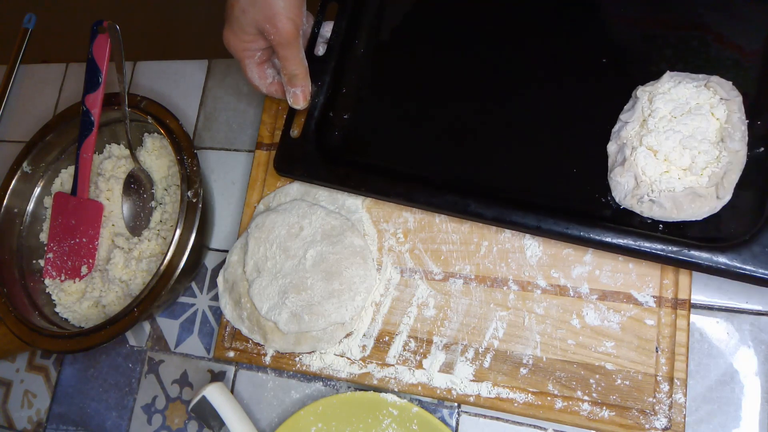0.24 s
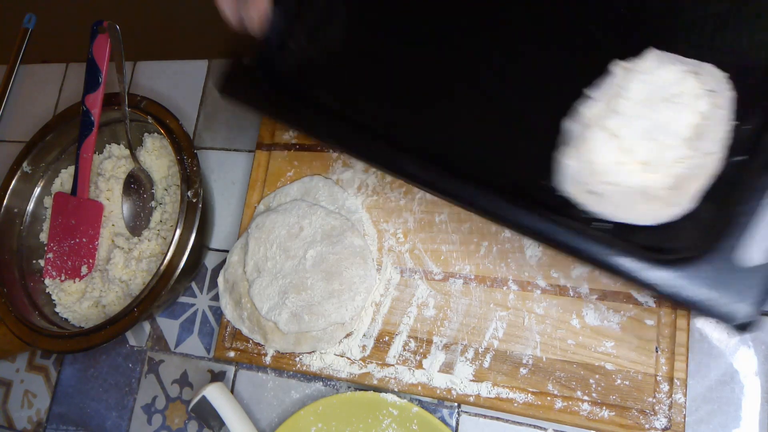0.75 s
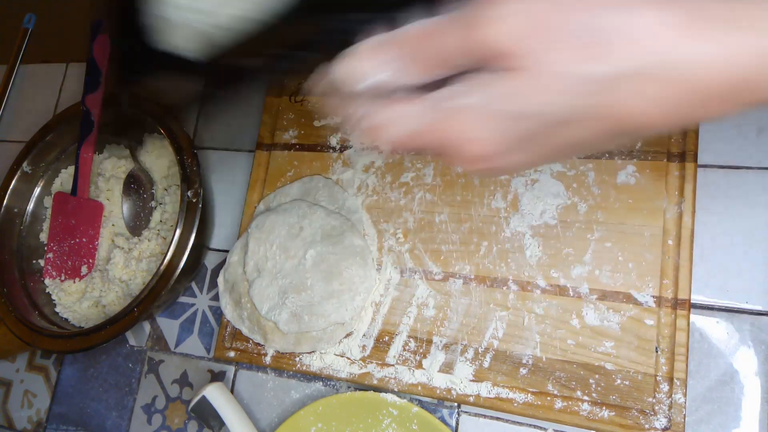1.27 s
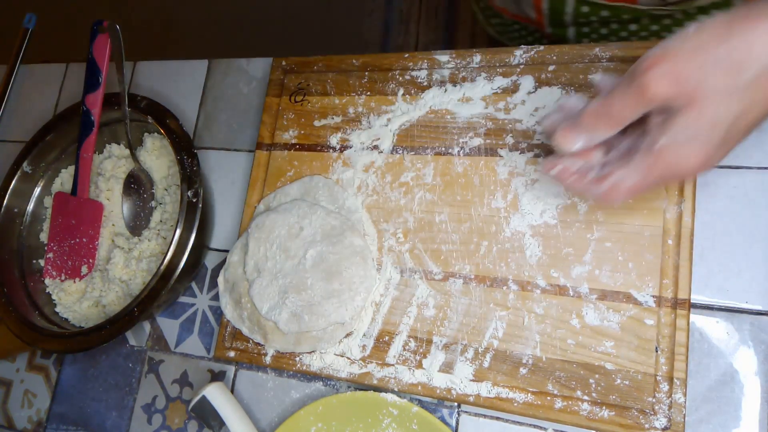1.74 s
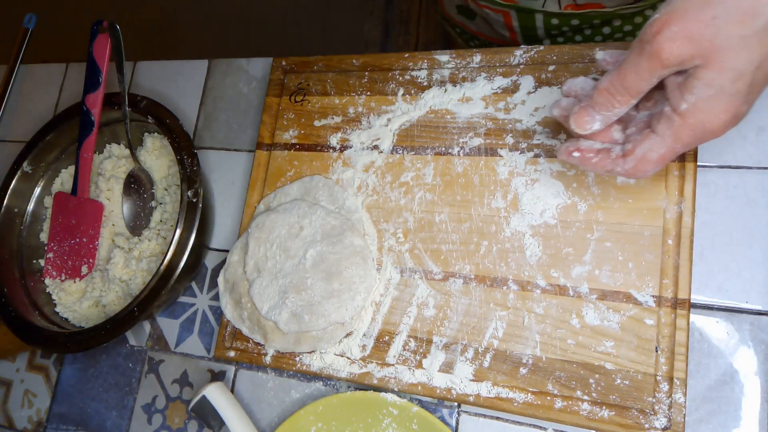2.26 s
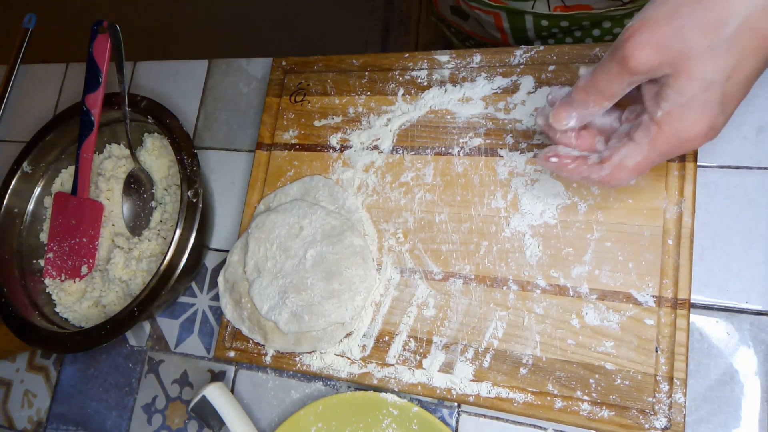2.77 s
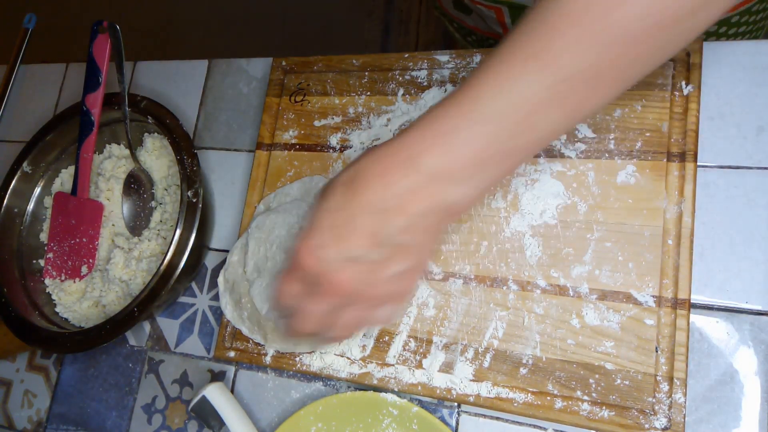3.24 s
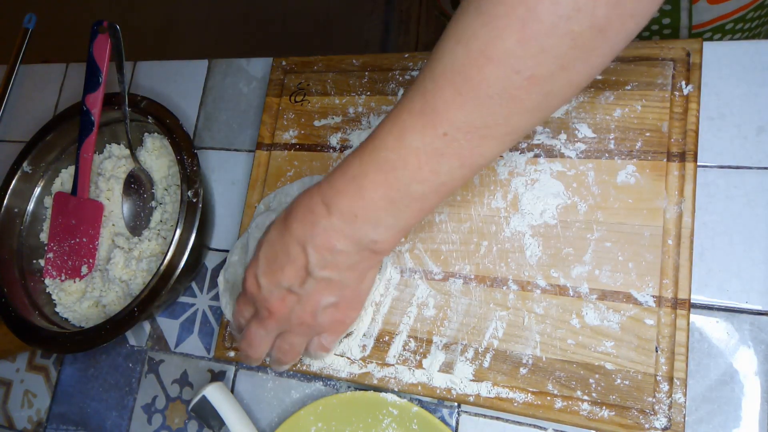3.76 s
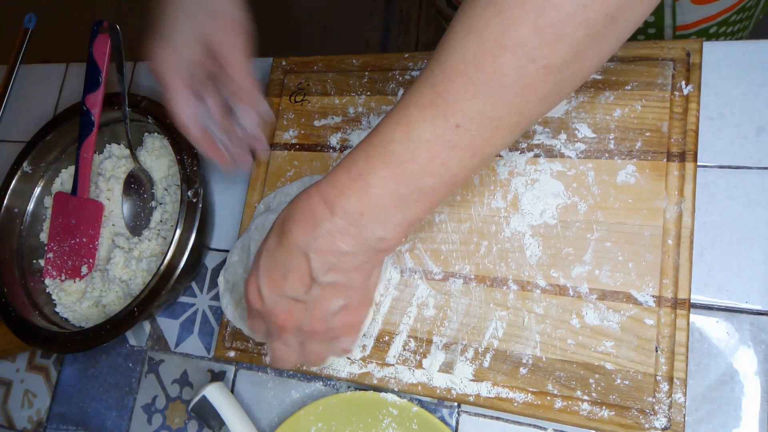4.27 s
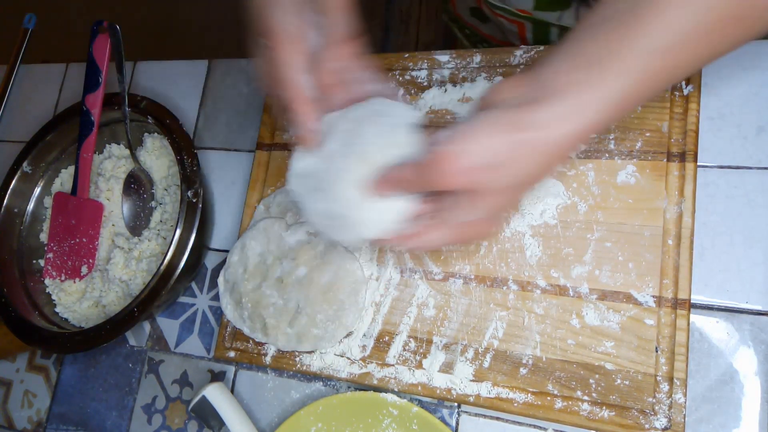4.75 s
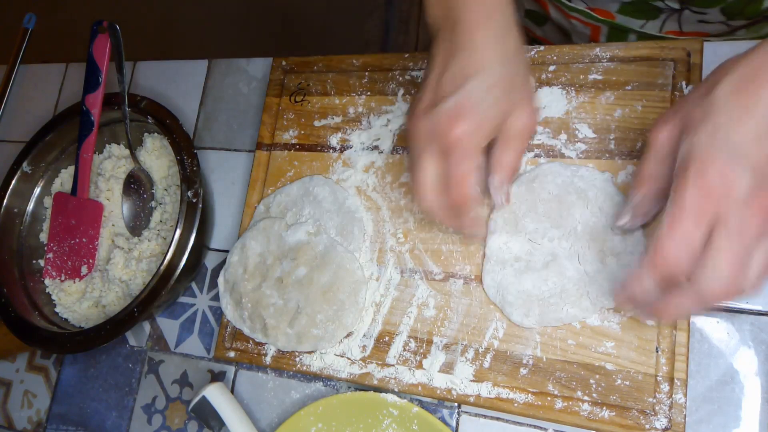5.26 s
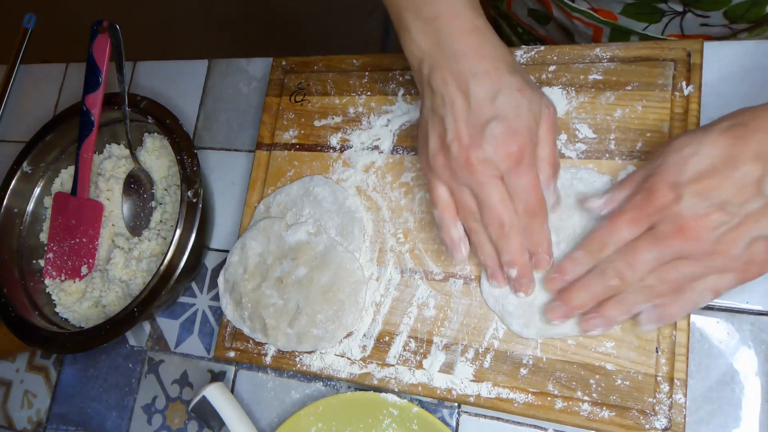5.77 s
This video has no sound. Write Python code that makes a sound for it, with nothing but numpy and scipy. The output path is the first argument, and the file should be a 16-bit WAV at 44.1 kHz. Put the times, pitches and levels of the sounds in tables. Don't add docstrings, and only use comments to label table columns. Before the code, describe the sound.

Gritty tray scraping, a loud woody slam and smaller bumps, followed by faint dough pats and floury rubbing over a low fridge hum.

```python
import sys
import numpy as np
from scipy import signal
from scipy.fft import rfft, irfft, next_fast_len
from scipy.io import wavfile
from scipy.ndimage import uniform_filter1d, map_coordinates

SR = 44100
rng = np.random.default_rng(int(sys.argv[2]) if len(sys.argv) > 2 else 0)


def invert_db(level):
    return 10 ** (np.asarray(level, dtype=float) / 20)


def persist_wave(psi):
    counts = np.round(np.clip(psi, -1, 1) * 32767).astype(np.int16)
    wavfile.write(sys.argv[1], SR, np.atleast_2d(counts).T)


N = 265041


def unit(x):
    return x / np.sqrt(np.mean(x ** 2) + 1e-20)


def along(points, hz):
    f, v = np.transpose(points)
    return np.interp(np.log(hz + 1), np.log(f + 1), v)


def wobble(rate_hz, count=N):
    knots = rng.standard_normal(int(count * rate_hz / SR) + 4)
    return map_coordinates(knots, [np.arange(count) * rate_hz / SR])


def filtered(x, response):
    m = next_fast_len(N + SR // 2)
    return irfft(rfft(x, m) * response(np.fft.rfftfreq(m, 1 / SR)), m)[:N]


def patchy(x, patchy_db, bins, frames):
    z = signal.stft(x, nperseg=512)[2]
    field = uniform_filter1d(rng.standard_normal(z.shape), bins, 0)
    field = uniform_filter1d(field, frames, 1)
    return signal.istft(z * invert_db(patchy_db * unit(field)), nperseg=512)[1][:N]


def dying_noise(colour, t60, count):
    hz, frame_s, z = signal.stft(rng.standard_normal(count), SR, nperseg=256)
    z *= invert_db(along(colour, hz)[:, None] - 60 * frame_s / along(t60, hz)[:, None])
    tail = signal.istft(z, SR, nperseg=256)[1][:count]
    return tail / np.sqrt(np.mean(tail[:SR // 50] ** 2))


def stroke_swell(t, rise_s, fall_s):
    return invert_db(-20 * np.abs(t / np.where(t < 0, rise_s, fall_s)) ** 1.39)


def friction(strokes, colour, spectrum, peaks, edges_hz, grit_db, ring_db, patchy_db):
    grain_db = grit_db * rng.exponential(size=N) + 1.13 * wobble(60)
    grains = patchy(rng.standard_normal(N) * invert_db(grain_db), patchy_db, 2, 10)

    def ring(f):
        modes = sum(invert_db(db) * 1j * f * w / (c * c - f * f + 1j * f * w) for c, w, db in peaks)
        return 1 + invert_db(ring_db) * modes

    def above(f, edge):
        return 1 / (1 + (edge / (f + 1)) ** 12)

    def body(f, low, high):
        return (above(f, low) - above(f, high)) * invert_db(along(spectrum, f)) * ring(f)

    bands = [unit(filtered(grains, lambda f: body(f, low, high))) for low, high in zip(edges_hz, edges_hz[1:])]
    dull, middle, *bright = bands
    power = np.zeros((len(bands), N))
    t = np.arange(-SR // 4, SR // 4) / SR
    for s, db, rise_s, fall_s, tilt_db in strokes:
        at = np.arange(len(t)) + round(s * SR) - SR // 4
        inside = (at >= 0) & (at < N)
        swell = invert_db(db) * stroke_swell(t, rise_s, fall_s)[inside]
        parts = invert_db(np.array([0] + [base_db + slope * tilt_db for base_db, slope in colour]))
        power[:, at[inside]] += np.outer(parts, swell) ** 2
    return np.sum(np.sqrt(power) * [middle, dull, *bright], axis=0)


def kitchen():
    # f/Hz, level/dB
    floor = [(15, -35), (40, -19), (60, -10.5), (123, -2), (200, -4), (240, -4), (300, -11.5), (750, -14.5),
             (1600, -18.5), (4000, -23), (6800, -25), (8000, -33), (13500, -33), (14800, -28),
             (16000, -23.5)]
    # f/Hz, level/dB rms
    hum_lines = [(236.9, -69), (473.7, -92), (705.2, -84.5), (748.3, -81.5)]
    hiss = filtered(patchy(rng.standard_normal(N), 1.55, 2, 10), lambda f: invert_db(along(floor, f)))
    t = np.arange(N) / SR
    hum = sum(invert_db(db + 3 + 0.4 * wobble(27)) * np.sin(2 * np.pi * hz * t + .4 * wobble(4)) for hz, db in hum_lines)
    rumble = filtered(hiss, lambda f: 1 / (1 + (f / 190) ** 8))
    hiss += (invert_db(2.5 * wobble(7) - 1) - 1) * rumble
    return invert_db(-64.5) * unit(hiss) + invert_db(-1.8) * hum


def hands():
    # peak t/s, level/dB, rise/s, fall/s, treble tilt/dB
    rubs = [(1.68, -76, .1, .05, 0), (1.806, -68, .012, 0.055, -3), (1.94, -78, 0.039, 0.059, 3),
            (2.412, -70, .015, .08, 1), (2.514, -72, .04, .07, -1), (3.124, -73, 0.06, .05, 1),
            (3.264, -74.5, 0.12, 0.098, -1.5), (3.365, -64, .07, .04, 7), (3.392, -60, .04, 0.045, 2),
            (3.518, -70, 0.068, 0.12, 2), (3.874, -78, .018, 0.027, 8), (4.496, -72.5, .032, 0.11, -3.5),
            (4.898, -74, .045, .03, 1), (5.1, -68, .08, .05, 5), (5.15, -59, .05, .04, 4),
            (5.183, -54.5, .05, .065, -4), (5.414, -76, 0.032, 0.035, 9), (5.452, -64.5, 0.011, 0.036, 2),
            (5.52, -73, 0.076, .04, 2), (5.64, -62.5, 0.036, 0.067, 3.5), (5.71, -72.5, .08, .06, 2),
            (5.8, -73, .04, 0.087, -4), (5.864, -66, 0.073, 0.024, 9.5), (5.965, -76, .03, .06, 3)]
    # level at tilt 0/dB, slope/(dB per dB tilt)
    rub_parts = [(-3, -1.22), (-7.5, 0.59)]
    # f/Hz, level/(dB per Hz)
    rub = [(590, -12), (1000, -8.5), (1390, -11), (2290, -5), (2610, -4.5), (2980, -1.5), (4160, 1),
           (4960, 10.5), (9300, 5.5), (14000, -14)]
    # f/Hz, width/Hz, level/dB
    skin = [(2010, 43, -12.5), (2260, 290, -0.5), (3000, 19, 2), (3740, 270, -4.5), (4380, 63, -19),
            (4600, 240, -21), (6500, 300, 3), (9260, 62, 4)]
    return friction(rubs, rub_parts, rub, skin, edges_hz=(900, 4000, 8000, 15000),
                    grit_db=0, ring_db=0, patchy_db=4)


def pats():
    # t/s, peak level/dB, f/Hz, t60/s
    knocks = [
        (0.569, -63, 1020, 0.08),
        (0.739, -61, 1020, 0.2),
        (1.03, -55, 324, 0.25),
        (4.508, -59.5, 813, 0.13),
        (5.145, -54, 434, 0.11),
        (5.185, -50, 432, 0.077),
        (5.449, -60, 407, 0.16),
    ]
    out, t = np.zeros(N + SR), np.arange(SR // 4) / SR
    for s, db, hz, t60 in knocks:
        attack = 1 - np.exp(-t / 0.0018)
        out[round(s * SR):][:len(t)] += invert_db(db - 60 * t / t60) * attack * np.sin(2 * np.pi * hz * t)
    return out[:N]


def rings_and_squeaks():
    # t/s, level/dB, f/Hz, length/s, width/Hz
    tray_rings = [(0.576, -43.5, 1770, 0.01, 410), (0.56, -63, 1800, 0.0096, 300),
                  (0.633, -54, 2300, 0.035, 750), (0.744, -48, 2020, 0.028, 80),
                  (1.264, -59, 1633, 0.071, 78), (.76, -58.5, 1050, 0.053, 450),
                  (1.02, -56.5, 1120, 0.09, 470), (1.1, -62, 1050, 0.03, 350), (0.99, -74, 2700, .06, 100),
                  (1.33, -75, 2500, 0.052, 93), (0.761, -63, 333, 0.027, 93),
                  (2.161, -62, 10570, 0.0085, 600), (2.17, -62, 5850, 0.027, 900),
                  (2.52, -74, 11000, .015, 200), (2.628, -70.5, 5800, 0.051, 1200)]
    # t/s, level/dB, f/Hz, length/s, width/Hz
    squeaks = [(1.742, -67, 14000, .004, 3000), (1.8017, -52, 9000, 0.0008, 6000),
               (1.8048, -50, 9000, 0.001, 6000), (1.805, -70, 1600, 0.019, 300),
               (3.08, -67, 2010, 0.062, 40), (3.385, -65, 2010, 0.095, 40), (3.4, -66, 3680, .05, 60),
               (3.365, -70, 8500, .03, 300), (3.365, -71, 10100, .03, 100), (5.181, -56, 4500, .003, 4000),
               (3.38, -66, 5100, 0.045, 120), (3.499, -72, 8640, 0.049, 100), (4.894, -70, 4100, .02, 200),
               (5.189, -58, 940, 0.025, 80), (5.216, -64, 845, 0.022, 80)]
    out = np.zeros(N + SR)
    t, f = np.arange(-SR // 4, SR // 4) / SR, np.fft.rfftfreq(SR // 2, 1 / SR)
    for s, db, hz, length_s, width_hz in tray_rings + squeaks:
        band = irfft(rfft(rng.standard_normal(len(t))) * np.exp(-2 * ((f - hz) / width_hz) ** 2))
        if width_hz < 130:
            band /= np.abs(signal.hilbert(band)) ** 0.6
        out[round(s * SR) - SR // 4:][:len(t)] += invert_db(db - 2.5) * np.exp(-2 * (t / length_s) ** 2) * unit(band)
    return out[:N]


def thuds():
    # t/s, level/dB, contact/s, room/dB, crack/dB
    blows = [
        (2.152, -15.5, 0.0017, -32.5, -35.5),
        (2.394, -29.5, 0.0054, -70, -82),
        (2.53, -42, .008, -76, -90),
        (2.5764, -32.5, 0.00084, -42, -43.5),
    ]
    gate_shuts = [
        2.325,
        2.55,
        2.68,
        2.695,
    ]
    # f/Hz, level/dB, t60/s
    slam = [(138.4, -13.5, 0.11), (174, -13.5, 0.16), (241, 0.5, 0.085), (347, -7, 0.036),
            (400.7, 5, 0.055), (423.8, -5.5, 0.16), (515, -16, 0.024), (542, -26, 0.21), (667, -25, 0.11),
            (783, -10, 0.082), (871, -29, 0.38), (939, -9.5, 0.075), (1096, -17, 0.081), (1382, -14, 0.077),
            (1555, -17.5, 0.077), (1778, -27, 0.5), (2185, -25, 0.083), (2460, -20, 0.054),
            (2620, -47, 0.305), (3150, -31, 0.049), (3650, -46, 0.27)]
    bump = [(70, -17, 0.32), (130.5, -2.5, 0.39), (170.6, 10.5, 0.098), (193, -9.5, 0.33), (290, 2.5, 0.2),
            (439, -16, 0.072)]
    shake = [(144.5, 8.5, 0.32), (115, -3, 0.52)]
    tap = [(114, -6, 0.29), (169.3, -5, 0.19), (303, -1, 0.19), (349, 5.5, 0.079), (442, 2, 0.088),
           (495, -11, 0.073), (672, -7.5, 0.15), (870, -19, 0.3), (940, -8, 0.17), (1220, -5.5, 0.061),
           (1592, -8, 0.11), (1846, -19, 0.24), (2280, -18.5, .1), (2700, -20, 0.2), (3070, -29, 0.15),
           (3460, -29, 0.16), (4020, -36, 0.18)]
    # f/Hz, level/(dB per Hz)
    room_colour = [(53, -58), (90, -29), (227, -2), (327, -12), (389, 15.5), (583, -33), (764, -4.5),
                   (1260, -22.5), (1820, -17.5), (2380, -44), (9000, -53), (11700, -87), (19800, -120)]
    # f/Hz, t60/s
    room_t60 = [(200, 0.25), (1000, 0.46), (4000, 0.17), (10000, .1)]
    # f/Hz, level/(dB per Hz)
    crack_colour = [(300, -32), (1000, 9.5), (2400, -1), (3200, -14.5), (5000, -19), (8000, -40.5),
                    (12000, -42), (16000, -46.5)]
    out, t = np.zeros(N + SR), np.arange(SR // 2) / SR
    rattle_db = 2.5 * (1 - np.exp(-t / .05))
    for (s, db, contact_s, room_db, crack_db), shut_s, modes in zip(blows, gate_shuts, (slam, bump, shake, tap)):
        ring = np.zeros(len(t))
        for hz, level_db, t60 in modes:
            fade = invert_db(level_db - 60 * t / t60 + rattle_db * wobble(40, count=len(t)))
            ring += fade * np.sin(2 * np.pi * hz * t)
        room = invert_db(room_db) * dying_noise(room_colour, room_t60, count=len(t))
        crack = invert_db(crack_db) * dying_noise(crack_colour, [(1000, 0.12)], count=len(t))
        gate = 1 / (1 + np.exp((t + s - shut_s) / .01))
        attack = (1 - np.exp(-t / contact_s)) ** 2
        out[round(s * SR):][:len(t)] += gate * attack * (invert_db(db) * ring + room + crack)
    return filtered(out[:N], lambda f: 1 / (1 - 1j * 70 / (f + 1)) ** 2)


def tray():
    # peak t/s, level/dB, rise/s, fall/s, treble tilt/dB
    slides = [(.482, -66, .014, 0.022, 0), (.571, -50, 0.015, 0.028, -3.5), (.61, -60, .025, .02, -20),
              (.635, -53.5, .045, 0.055, -7), (.742, -45.5, .04, .035, 0.5), (.768, -46, .03, .03, 6),
              (.816, -54.5, 0.062, 0.039, -1), (.87, -50.5, 0.031, .04, 9.5), (.94, -45, 0.094, 0.097, 6.5),
              (.992, -45, .07, .055, 3), (1.028, -44, .03, .04, 2), (1.052, -43.5, .03, .06, 2.5),
              (1.16, -65.5, 0.05, .1, 3), (1.225, -59.5, 0.11, 0.067, 2), (1.265, -49, 0.037, 0.038, 1),
              (1.31, -65.5, 0.038, 0.08, -4)]
    # level at tilt 0/dB, slope/(dB per dB tilt)
    scrape_parts = [(-5.5, -0.79), (-10, 0.57), (-14, 1.5)]
    # f/Hz, level/(dB per Hz)
    scrape = [(410, -60), (700, -21), (1380, -3), (1720, -8.5), (1990, -9.5), (2290, -8.5), (4010, -3),
              (5780, -4), (6500, -3.5), (8010, -11), (9740, -13.5), (12800, -22.5), (15800, -7)]
    # f/Hz, width/Hz, level/dB
    sheet = [(1600, 120, 4.5), (1990, 170, 1.5), (2670, 220, -1), (4650, 500, -8), (5420, 144, -13),
             (6560, 710, 0), (8500, 350, -10), (9530, 400, -11), (10500, 300, -9), (15400, 2700, 0.5)]
    return friction(slides, scrape_parts, scrape, sheet, edges_hz=(1450, 2400, 8000, 12000, 17000),
                    grit_db=0.3, ring_db=0.5, patchy_db=3.6)


def scene():
    return (kitchen() + hands() + pats() + rings_and_squeaks() + thuds() + tray())[None]


def band_limit(x):
    return signal.sosfilt(signal.butter(12, 15920, fs=SR, output="sos"), x)


def record(dry):
    mix = filtered(dry[0], lambda f: f < 15850)[None]
    return band_limit(mix)


dry = scene()
out = record(dry)
persist_wave(out)
```